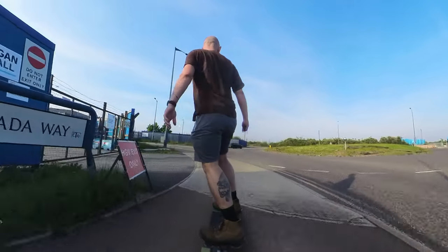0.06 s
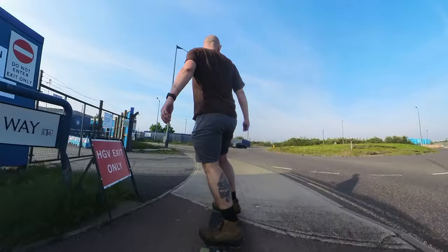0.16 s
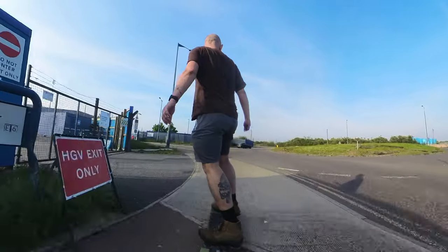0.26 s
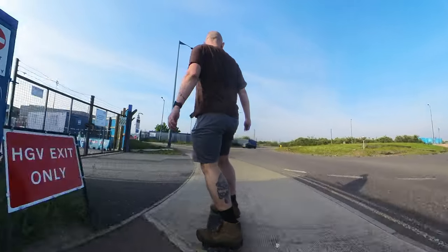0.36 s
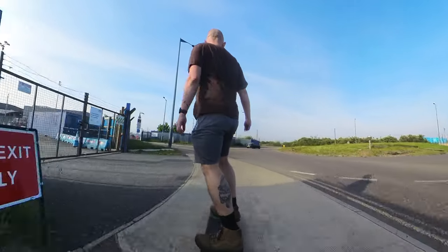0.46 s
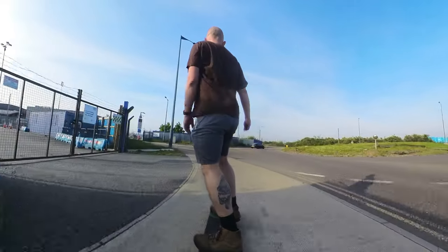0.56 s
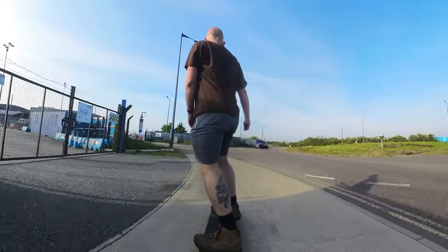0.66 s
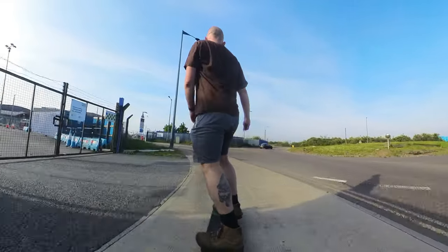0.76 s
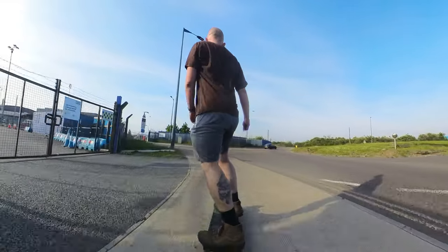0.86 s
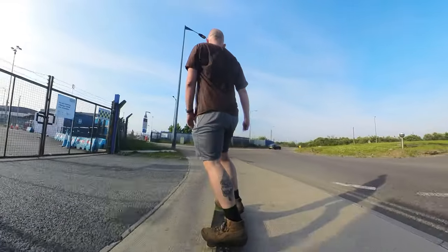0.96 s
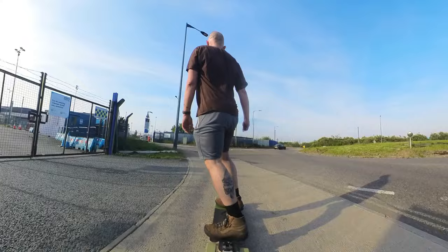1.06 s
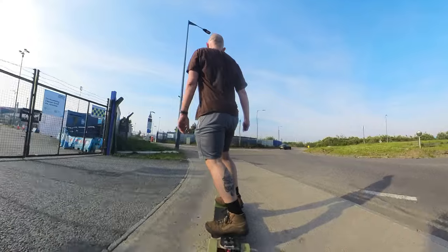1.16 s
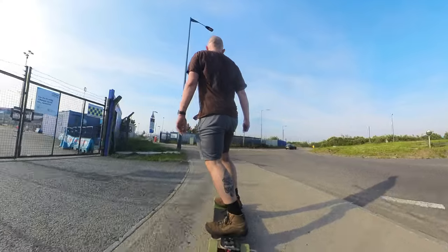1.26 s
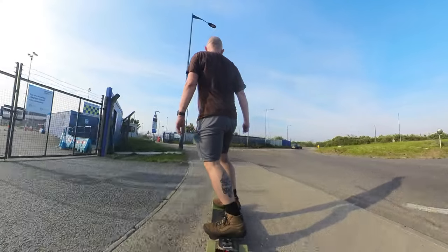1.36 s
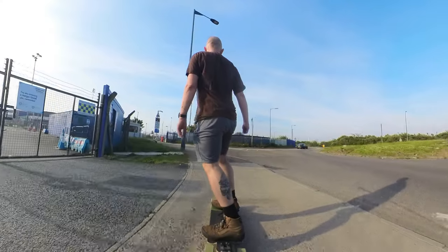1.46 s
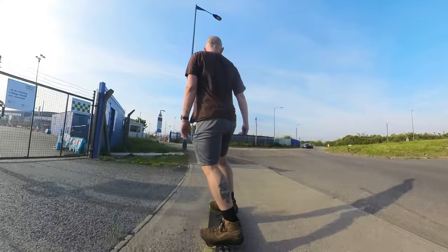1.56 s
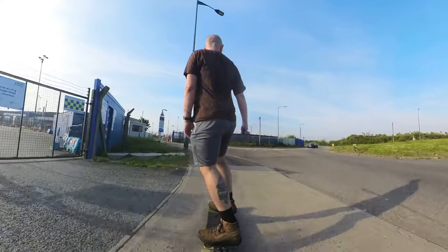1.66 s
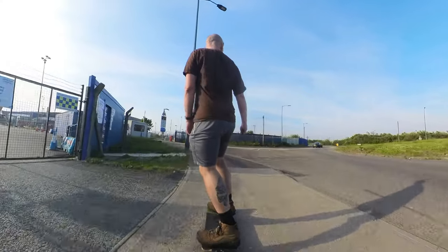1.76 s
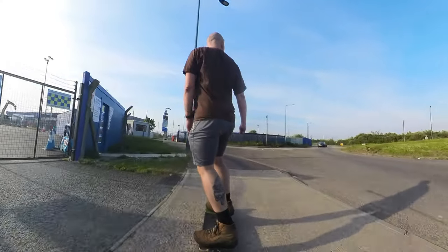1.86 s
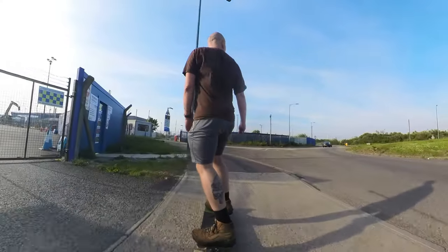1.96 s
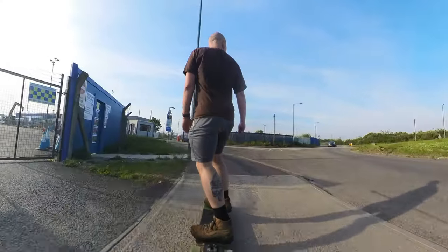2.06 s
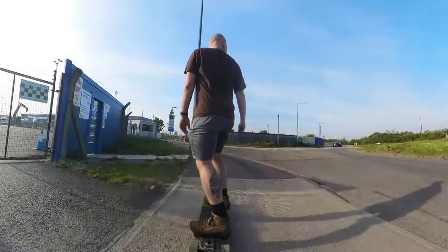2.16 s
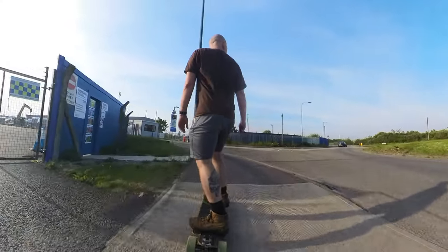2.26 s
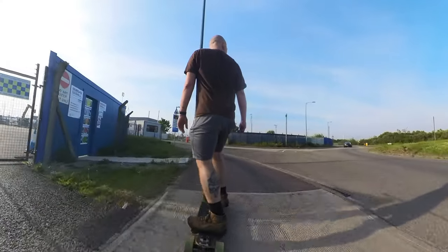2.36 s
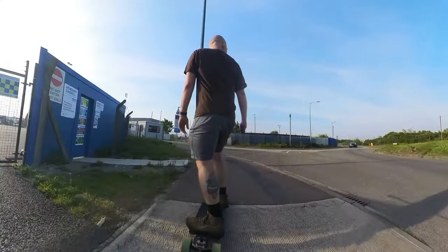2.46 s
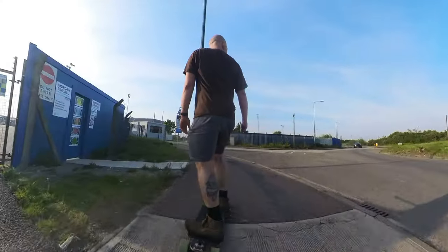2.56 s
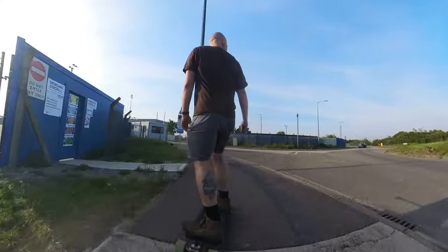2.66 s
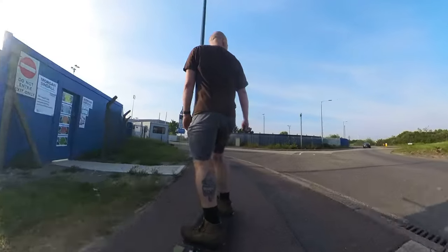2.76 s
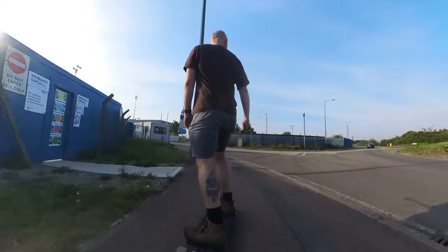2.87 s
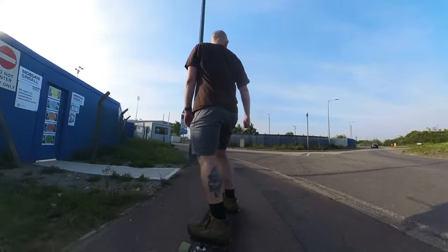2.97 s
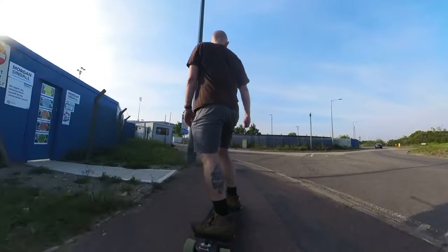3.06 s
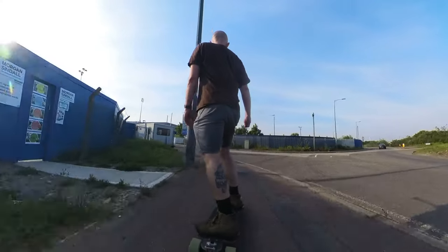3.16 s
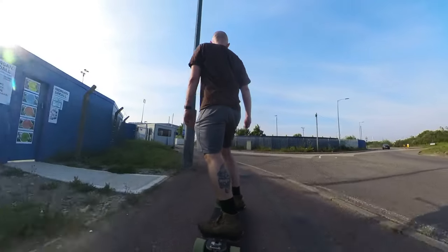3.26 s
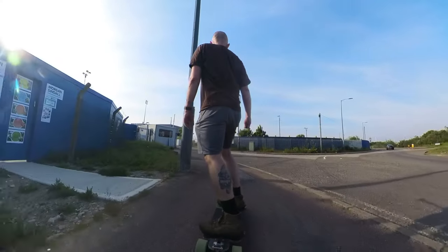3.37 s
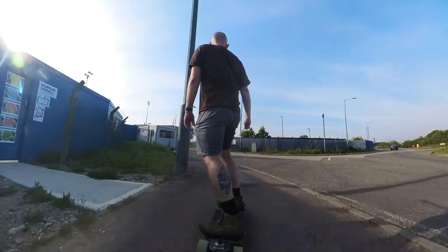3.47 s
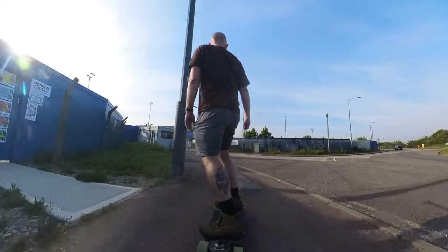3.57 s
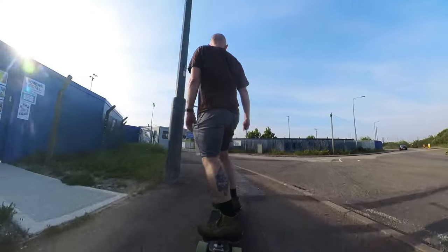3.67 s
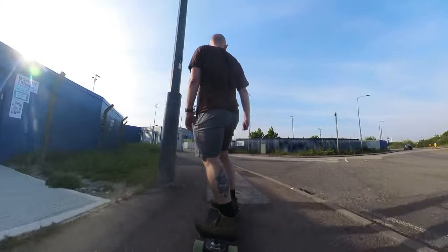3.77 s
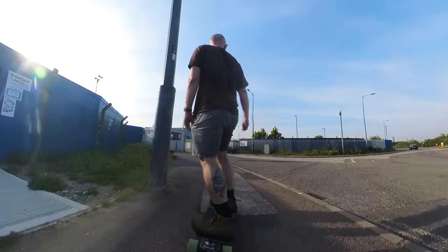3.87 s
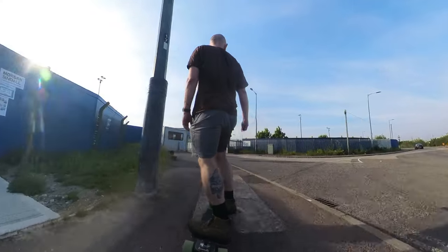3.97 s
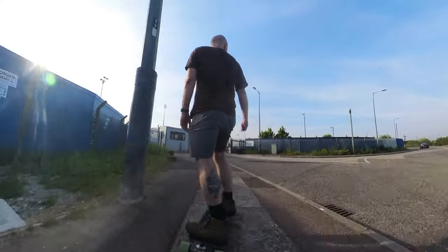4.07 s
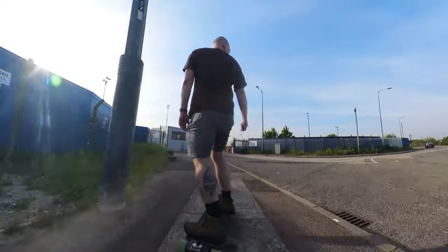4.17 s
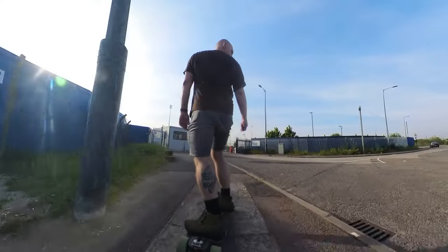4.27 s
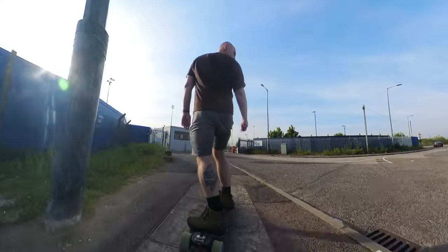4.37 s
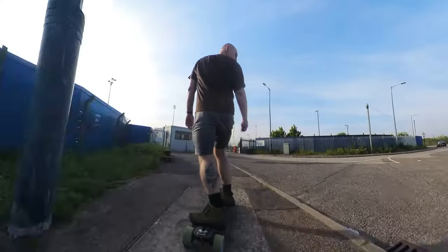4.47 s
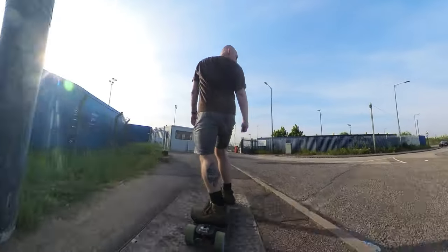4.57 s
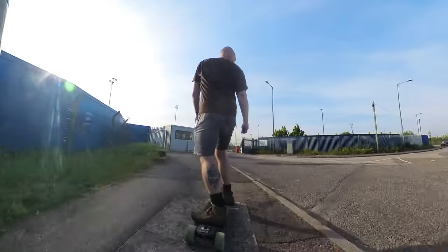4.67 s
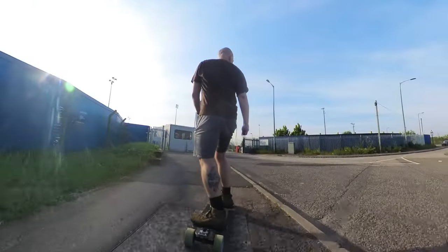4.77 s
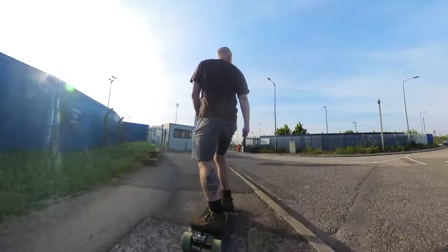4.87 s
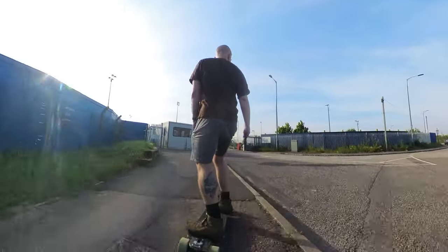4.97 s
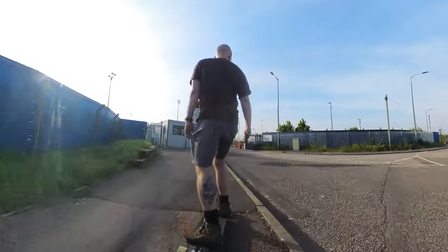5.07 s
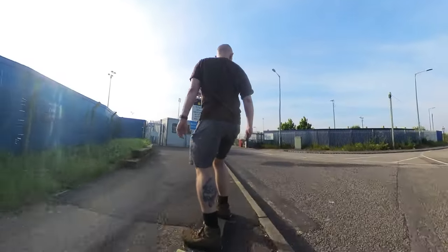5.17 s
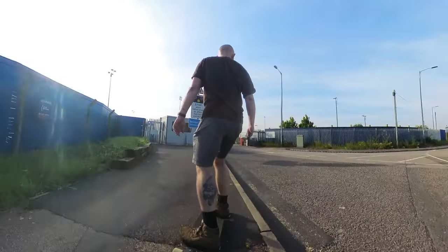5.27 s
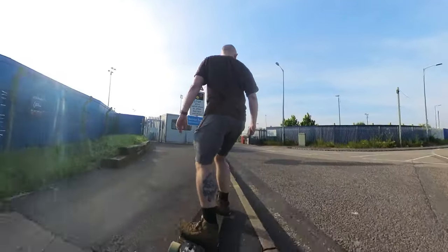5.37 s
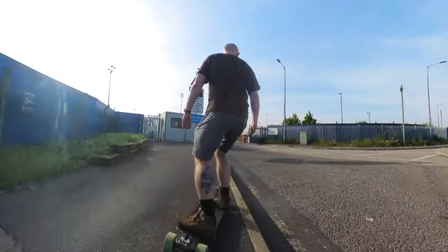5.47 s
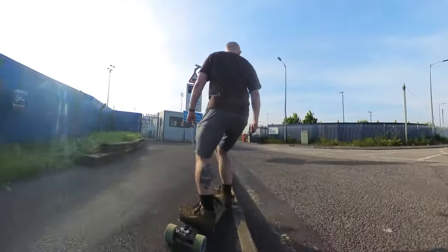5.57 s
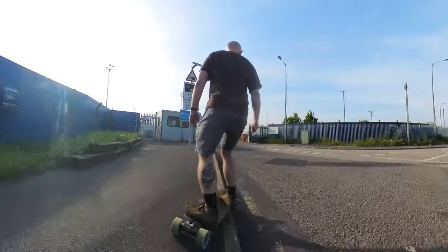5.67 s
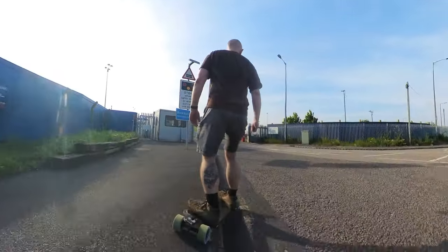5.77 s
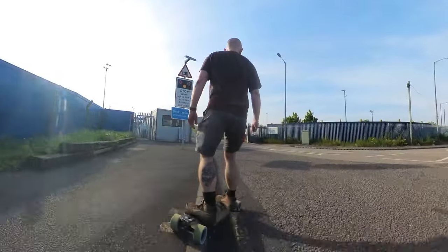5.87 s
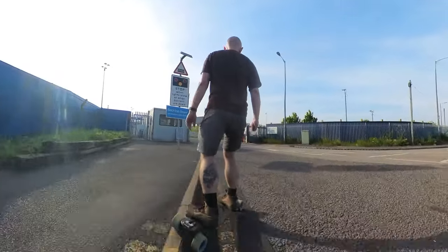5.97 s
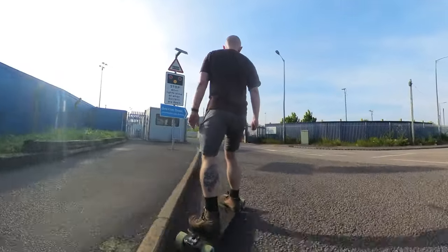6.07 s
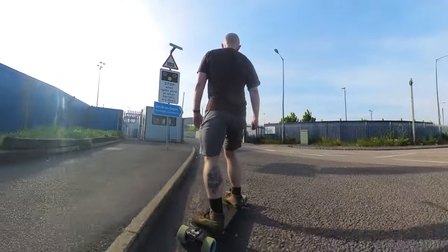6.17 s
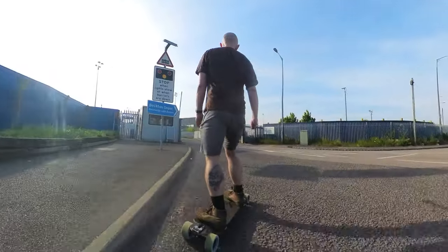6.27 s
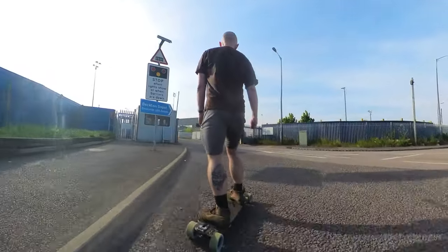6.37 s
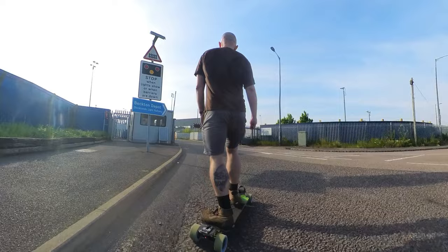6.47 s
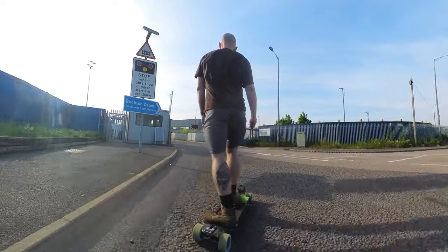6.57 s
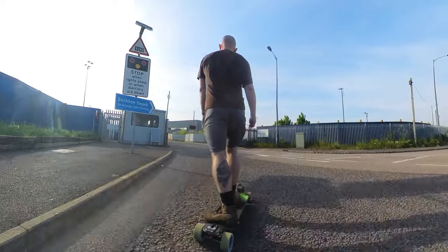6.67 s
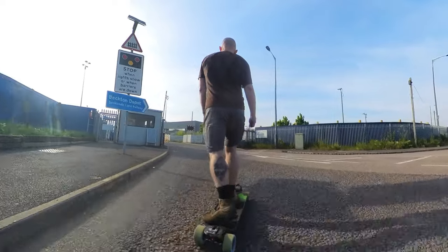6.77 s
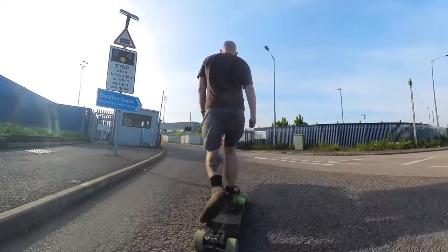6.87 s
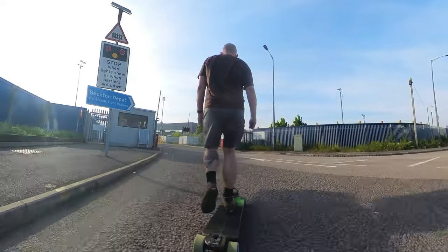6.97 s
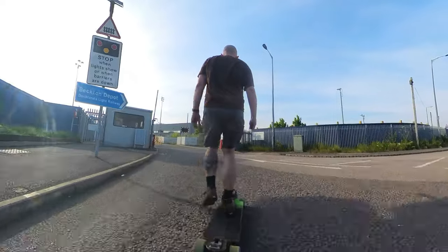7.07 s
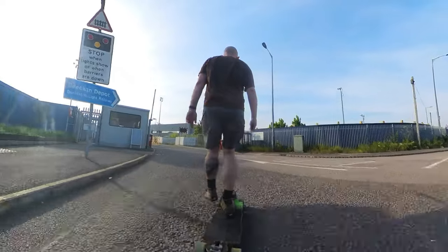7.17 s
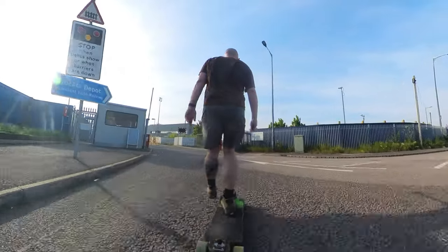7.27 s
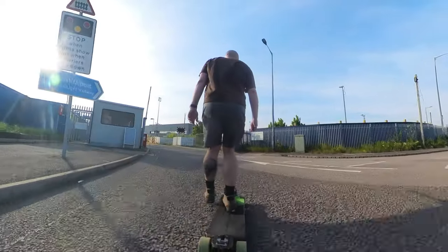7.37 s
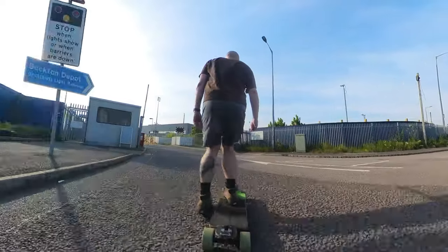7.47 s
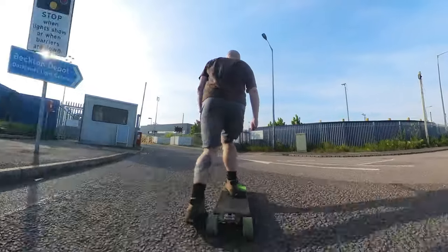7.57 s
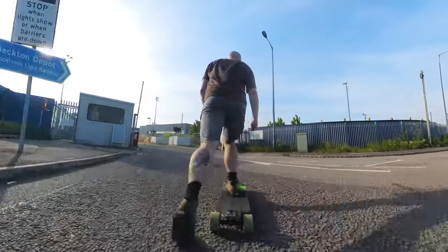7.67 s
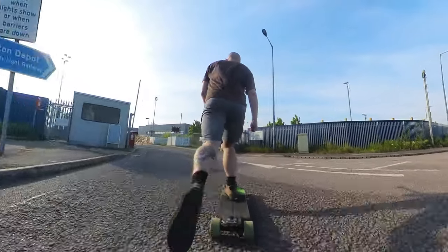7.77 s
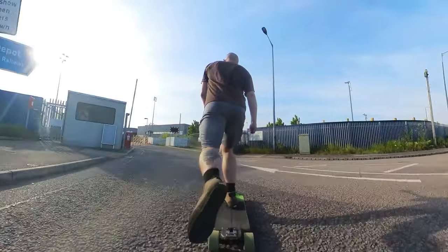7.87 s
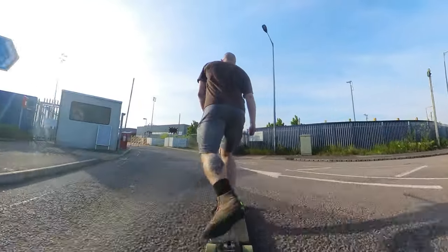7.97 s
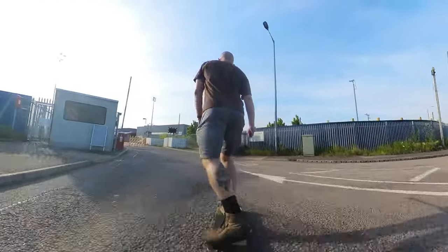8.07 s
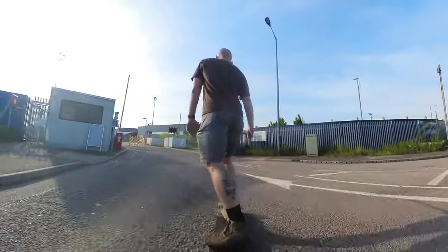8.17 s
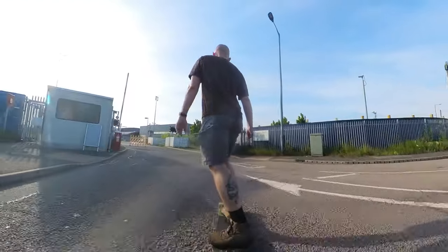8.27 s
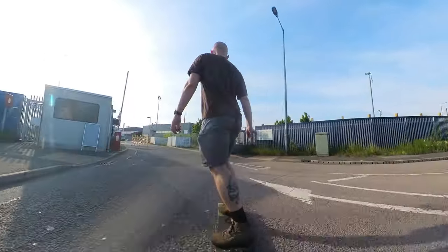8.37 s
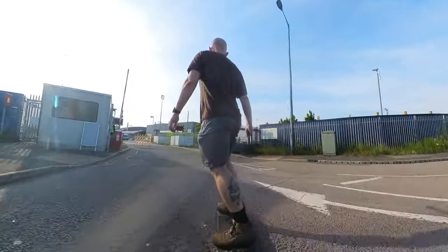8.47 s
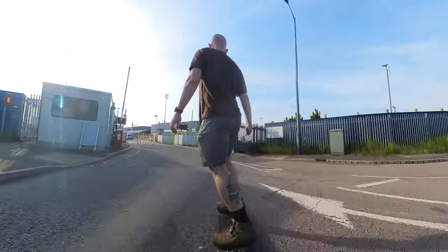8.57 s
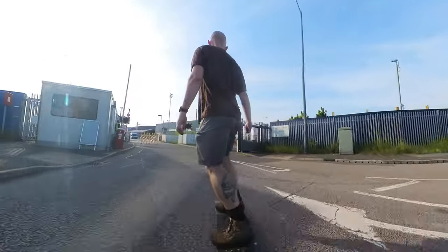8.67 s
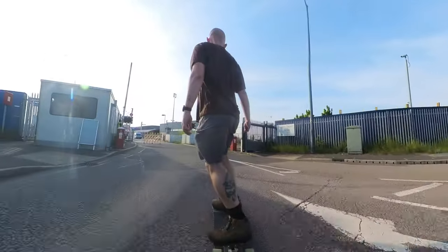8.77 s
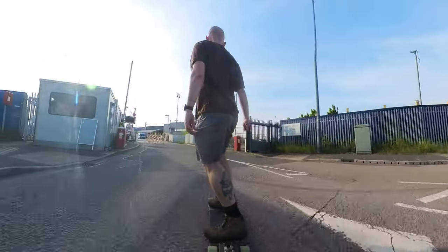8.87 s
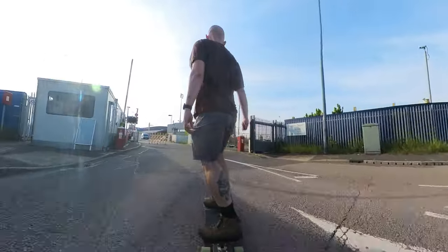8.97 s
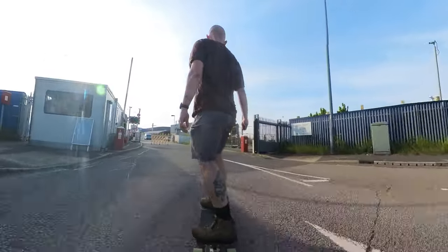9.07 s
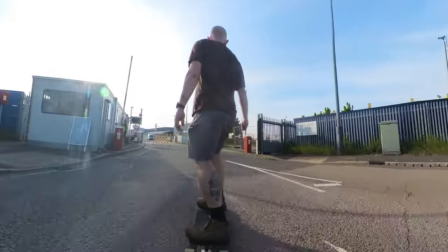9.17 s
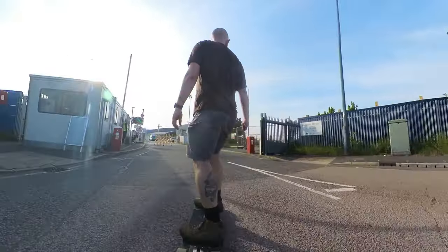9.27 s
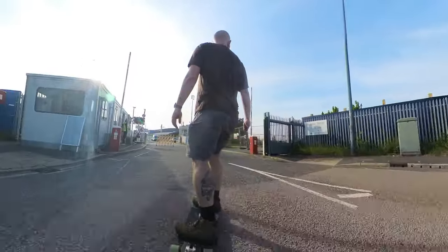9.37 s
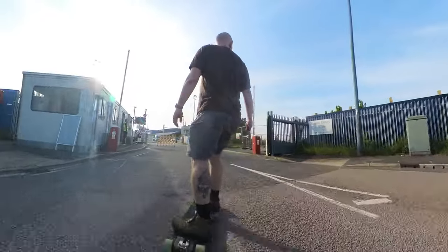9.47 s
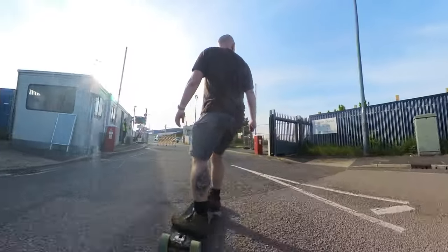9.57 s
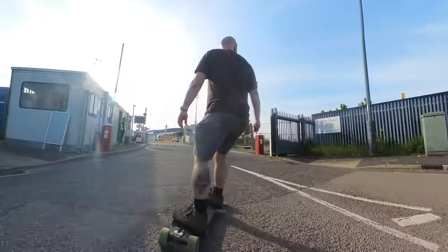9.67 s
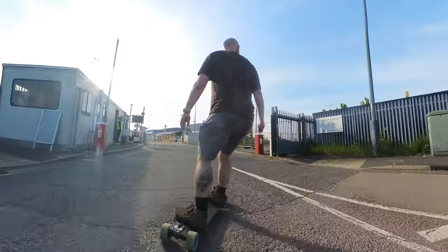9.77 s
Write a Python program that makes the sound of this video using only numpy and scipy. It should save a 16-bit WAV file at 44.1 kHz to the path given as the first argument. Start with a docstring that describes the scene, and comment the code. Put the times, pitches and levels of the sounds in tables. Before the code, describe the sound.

Outdoors, a microphone close behind a longboard picks up soft wheels rolling on pavement in a low, gritty hum. Joints and covers give short woody knocks and dull thuds, thickening into a heavy clatter around the middle. The board then drops off a kerb with sharp cracks, and rolls onto coarse asphalt, with rougher, rattling surges before it smooths out. Faint wind and a few tiny bird chirps sit behind.

```python
"""Longboard over rough paving

A longboard rolls over pavement, drain covers, a kerb and coarse asphalt, heard from a pole behind the rider.
Random stones in the road drive resonances of deck, trucks and bearings, and a broad tyre roar.
Joints and edges strike the same board with short noisy forces, bumps bend it, and one kerb blow rings it.
Loose grit ticks, snaps and scuffs in filtered bursts; far birds are gliding sines, wind is low lumpy noise.
The output stage rounds off peaks near full scale and cuts the extreme treble."""
import sys
import numpy as np
from scipy import signal
from scipy.fft import rfft, irfft, next_fast_len
from scipy.io import wavfile

SR = 44100
rng = np.random.default_rng(int(sys.argv[2]) if len(sys.argv) > 2 else 0)


def wrap_up_sound(samples):
    """Save the sound to the file named by the first command line argument, as 16-bit audio."""
    columns = np.atleast_2d(samples).T
    # keep every value between -1 and 1, then stretch to whole-number steps
    tamed = np.clip(columns, -1, 1)
    steps = np.round(tamed * 32767).astype(np.int16)
    wavfile.write(sys.argv[1], SR, steps)


N = 432609   # samples

# Resonances of the deck. Each row: centre in Hz, width in Hz, level in dB.
DECK_MODES = [(287, 87, 4.5), (541, 87, 4), (722, 65, -5.5), (960, 197, -4.5), (1350, 580, -11.5),
              (1500, 690, -15), (2005, 52, -23.5)]
# Resonances of the trucks. Each row: centre in Hz, width in Hz, level in dB.
TRUCK_MODES = [(1520, 400, 6), (1855, 170, -3)]
# Two ringing resonances of the truck hangers, then a broad hiss of fine sand.
# Each row: centre in Hz, width in Hz, level in dB.
HANGER_AND_SAND_MODES = [(3380, 220, -4), (3580, 110, 0), (4800, 3600, -17)]
# Low bending resonances of the deck. Each row: centre in Hz, width in Hz, level in dB.
BENDING_MODES = [(82.2, 47, -3), (130.9, 34.2, 2.5), (184, 92, -4.5)]
# How strongly rough ground sounds hangers and sand. Each row: time in seconds, level in dB.
HANGER_AND_SAND_LEVEL = [(0, -70), (1.3, -70), (1.7, -75), (4.4, -75), (4.75, -71), (5.2, -77), (5.85, -74),
                         (6.1, -66), (6.45, -67), (6.85, -75), (7.05, -70), (7.3, -63), (7.55, -62),
                         (7.75, -63), (7.87, -65), (7.97, -59), (8.1, -64), (8.2, -60), (8.3, -63),
                         (8.45, -72), (8.65, -77), (9.81, -75)]


def amp(db):
    """Decibels to gain."""
    return 10 ** (np.asarray(db) / 20)


def rms_one(x):
    """Scale to unit rms."""
    return x / np.sqrt(np.mean(x ** 2) + 1e-20)


def in_time(rows):
    """Draw each column of a timed table as a curve with one value a sample."""
    s, *columns = np.transpose(rows)
    return [np.interp(np.arange(N) / SR, s, column) for column in columns]


def drift(rate_hz):
    """Smooth random wander of unit rms: noise at a fortieth of the sample rate through a double pole."""
    r = np.exp(-80 * np.pi * rate_hz / SR)
    noise = rng.standard_normal(N // 40 + 2002)
    slow = signal.lfilter([1], [1, -2 * r, r * r], noise)[2000:]   # drop the filter's start
    return np.interp(np.arange(N) / 40, np.arange(len(slow)), rms_one(slow))


def resonate(x, hz, width_hz):
    """One two-pole resonance with gain 1 at its peak."""
    r = np.exp(-np.pi * width_hz / SR)
    feed = np.array([1, 0, -1]) * (1 - r * r) / 2
    return signal.lfilter(feed, [1, -2 * r * np.cos(2 * np.pi * hz / SR), r * r], x)


def body(x, modes):
    """Resonances in parallel, with alternating signs."""
    return sum((-1) ** k * amp(db) * resonate(x, hz, width) for k, (hz, width, db) in enumerate(modes))


def soften(x, hz):
    """Rubber wheels spread each contact in time, which acts as a low-pass."""
    return signal.sosfilt(signal.butter(3, hz, fs=SR, output="sos"), x)


def rolling(rolling_db, boom_db):
    """One road drives deck, bending, hangers and sand; further stones feed roar, bearings and trucks."""
    # Surface coarseness. Each row: time in seconds, bearing hiss in dB, truck rattle in dB.
    coarseness = [(0, -67.5, -62), (.6, -75, -63), (.9, -81, -76), (1.2, -76, -72), (1.6, -85, -76),
                  (2.7, -80, -61), (3.1, -83, -51), (4.4, -85, -62), (4.8, -80, -76), (5.3, -88, -82),
                  (5.85, -75, -55), (6.1, -76, -59), (6.45, -70.5, -71), (6.9, -77, -77), (7.1, -75, -60),
                  (7.3, -73, -54), (7.45, -75, -57), (7.6, -71, -60), (7.73, -65, -54), (7.87, -67, -64),
                  (7.93, -67, -48), (8.0, -65, -54), (8.1, -70, -69), (8.17, -65, -52), (8.28, -70, -57),
                  (8.42, -68, -70), (8.6, -78, -86), (9.05, -83, -74), (9.27, -72, -72), (9.81, -77, -82)]
    # Bearing resonances. Each row: centre in Hz, width in Hz, level in dB.
    bearing_modes = [(10500, 3000, -6), (12500, 1500, 0), (15300, 1500, -8)]
    roar_db = 2.5   # against the deck

    hiss_db, rattle_db = in_time(coarseness)
    ring_db = in_time(HANGER_AND_SAND_LEVEL)[0]
    road = stones(per_s=8000, spread_db=2.8, lumpy_db=.7)
    deck = rms_one(soften(soften(body(road, DECK_MODES), 2520), 2550))
    tyres = roar(stones(per_s=9000, spread_db=3.0, lumpy_db=1.0))
    hum = rms_one(deck + amp(roar_db) * tyres)

    bending_force = road + 2.3 * rng.standard_normal(N)
    boom = rms_one(body(body(bending_force, BENDING_MODES), BENDING_MODES))
    hiss = rms_one(body(stones(per_s=6000, spread_db=2.5, lumpy_db=2.1), bearing_modes))

    # loose hardware rattles in surges over its own sparser stream of stones
    loose = stones(per_s=1200, spread_db=2.5, lumpy_db=0.0) * amp(3.8 * drift(13.4))
    rattle = soften(jangle(loose, TRUCK_MODES), 2340)
    ring = jangle(road + 0.85 * loose, HANGER_AND_SAND_MODES)

    board = amp(rolling_db) * hum + amp(boom_db) * boom
    treble = amp(hiss_db) * hiss + amp(rattle_db) * rattle + amp(ring_db) * ring
    return board + treble


def stones(per_s, spread_db, lumpy_db):
    """Stones of uneven size pass under the wheels, as random impulses in lumps."""
    sizes = amp(spread_db * np.minimum(rng.exponential(1, N), 4)) * rng.choice([-1, 1], N)
    met = rng.random(N) < per_s / SR
    lumps = amp(lumpy_db * (drift(35) + drift(52)))
    return rms_one(sizes * met * lumps) + 1e-18


def roar(contact):
    """The contact patch radiates a broad roar, strongest in the low mids and falling towards the treble."""
    # Tyre roar spectrum. Each row: frequency in Hz, relative density in dB per Hz.
    roar_shape = [(90, -33), (150, -10), (250, -1.5), (370, -10.5), (590, -3.5), (660, -13.5),
                  (1000, -14.5), (1600, -20.5), (2080, -26), (2300, -31), (3500, -38), (5000, -46),
                  (8000, -56), (16000, -75)]
    hz, db = np.transpose(roar_shape)
    size = next_fast_len(N)
    grid = np.arange(size // 2 + 1) * SR / size + 1   # 1 Hz up, so the logarithm exists
    gain = amp(np.interp(np.log(grid), np.log(hz), db))
    return rms_one(irfft(rfft(contact, size) * gain, size)[:N])


def jangle(force, modes):
    """Resonances take turns in level, so the pitch seems to wander."""
    out = 0
    for hz, width, db in modes:
        mode = resonate(resonate(force, hz, width), hz, 3 * width)
        out = out + amp(db + 2.0 * drift(9.5)) * mode
    return rms_one(out)


def knocks():
    """Wheels meet edges: a short shudder rings a deck tone and upper modes of chance strength."""
    # Each row: start in seconds, level of the deck tone's peak in dB, main deck tone in Hz,
    # upper ring against that tone in dB, shudder decay in seconds (1 ms at least).
    edge_hits = [(0.272, -21.5, 237, -22, 0.0053), (0.352, -20.5, 273, -13.5, 0.014),
                 (0.579, -21, 233, -11, 0.01), (0.737, -29, 440, -30, 0.0059),
                 (0.931, -31, 258, -17, 0.028), (2.576, -19, 273, -11, 0.016),
                 (2.588, -13.5, 314, -17, 0.014), (2.843, -26, 440, -15, 0.023),
                 (2.852, -19.5, 407, -18, 0.021), (3.733, -30, 610, -15, 0.0099),
                 (3.964, -19.5, 198, -19.5, 0.044), (3.974, -19, 590, -12.5, 0.011),
                 (4.24, -18, 326, -22, 0.022), (4.275, -24.5, 400, -18, 0.014),
                 (4.529, -16.5, 294, -19, 0.0084), (4.69, -12, 303, -6.5, 0.0067),
                 (4.719, -9, 204, -12.5, 0.011), (4.738, -10.5, 290, -15.5, 0.014),
                 (4.833, -16.5, 202, -20, 0.016), (4.981, -21, 454, -30, 0.0053),
                 (5.112, -23, 446, -15, 0.011), (5.211, -24.5, 240, -21, 0.042),
                 (5.822, -26.5, 620, -7, 0.0056), (5.911, -27, 596, -5, 0.029),
                 (5.956, -10.5, 497, -14, 0.0065), (5.963, -16, 200, -10, 0.0044),
                 (5.977, -19, 610, -20, 0.0034), (6.029, -21, 367, -17, 0.014),
                 (6.091, -16.5, 327, -13, 0.015), (6.202, -8.5, 636, -7.5, 0.011),
                 (6.209, -5, 277, -10.5, 0.0016), (6.223, -5.5, 600, -16, 0.01),
                 (6.446, -19, 620, -3, 0.0089), (6.553, -18.5, 291, -13.5, 0.03),
                 (6.569, -21.5, 466, -10.5, 0.012), (7.149, -29.5, 583, -1, 0.004),
                 (7.181, -32, 560, -3, 0.006), (7.314, -22.5, 825, -9, 0.0076),
                 (7.53, -38, 600, -2, 0.0027), (7.67, -25, 210, -3, 0.006), (7.719, -19, 600, -12.5, 0.028),
                 (7.948, -22, 503, -9, 0.022), (8.066, -22, 504, -3, 0.0059), (8.131, -27, 600, -9, 0.0044),
                 (8.172, -20, 301, -8, 0.0028), (8.246, -17, 525, -16, 0.0068),
                 (8.274, -17.5, 633, -7, 0.0029), (8.283, -15, 650, -2, 0.0037),
                 (8.289, -13, 710, -9, 0.0018), (8.3, -35, 576, -11, 0.0033),
                 (8.312, -18.5, 655, -26, 0.0058), (8.386, -16, 640, -17, 0.0024),
                 (9.26, -32, 580, 5.5, 0.0045), (9.303, -27.5, 301, -19, 0.02)]
    ring_low_hz, ring_high_hz = 1416, 1940
    aftershake_db, aftershake_s = -13.5, 0.024   # the board keeps trembling after a knock
    crunch_db, crunch_low_hz, crunch_high_hz = -7.5, 700, 2330   # crushed grit, against the clack

    size = 5000
    out = np.zeros(N + size)
    t = np.arange(size) / SR
    crunch_band = signal.butter(2, [crunch_low_hz, crunch_high_hz], "band", fs=SR, output="sos")
    metal = [(hz, width, db - 32.0) for hz, width, db in TRUCK_MODES[1:] + HANGER_AND_SAND_MODES[:1]]
    modes = DECK_MODES + metal
    draws = rng.standard_normal((len(edge_hits), size))
    luck = rng.standard_normal((len(edge_hits), len(modes)))
    rings = ring_low_hz + (ring_high_hz - ring_low_hz) * rng.random(len(edge_hits))

    for (s, db, hz, bright_db, shudder), noise, strengths, ring_hz in zip(edge_hits, draws, luck, rings):
        force = .15 * noise * np.exp(-t / max(shudder, .001)) * np.minimum(t / .002, 1)
        tremble = noise[::-1] * np.exp(-t / aftershake_s) * np.minimum(t / 0.0045, 1)
        force += 0.16 * amp(aftershake_db) * tremble
        force[:30] -= .2 * np.hanning(30)   # the wheel climbs the edge
        force = soften(force, 7800)

        struck = [(f, 1.04 * width, level + 3.7 * k) for (f, width, level), k in zip(modes, strengths)]
        # the four lowest deck modes colour the tone, the others make the clack
        tone = soften(resonate(force, hz, 60) + 0.5 * body(force, struck[:4]), 1260)
        ring = resonate(resonate(force, ring_hz, 300), ring_hz, 550)
        clack = body(force, struck[4:]) + 0.26 * ring
        clack = soften(soften(clack, 2400), 2400)
        crunch = signal.sosfilt(crunch_band, force * np.abs(noise[::-1]))
        crunch = soften(soften(crunch, crunch_high_hz), crunch_high_hz)

        upper = clack / np.abs(clack).max() + amp(crunch_db) * crunch / np.abs(crunch).max()
        hit = tone / np.abs(tone).max() + amp(bright_db) * upper / np.abs(upper).max()
        at = round(s * SR)
        out[at:at + size] += amp(db) * hit
    return out[:N]


def kerb():
    """The front truck hits the kerb stone: a noisy crack and a few decaying deck modes."""
    # Start in seconds, then the deck modes. Each mode row: frequency in Hz, starting level in dB,
    # time to fall by 60 dB in seconds.
    kerb_blow = (5.9354, [(464.5, 17.5, 0.022), (340, 9.5, 0.013), (770, 0.5, 0.019), (1050, 2.5, 0.016)])
    crack_db, crack_t60_s = 4.5, 0.039
    s, modes = kerb_blow
    t = np.maximum(np.arange(N) / SR - s, 0)
    crack = amp(crack_db - 60 * t / crack_t60_s) * (t > 0) * soften(rng.standard_normal(N), 2100)
    ring = sum(amp(db - 60 * t / t60) * np.sin(2 * np.pi * hz * t) for hz, db, t60 in modes)
    return crack - np.minimum(t / 0.00047, 1) * ring


def bumps():
    """Each bump pushes the deck once and shakes it briefly; its bending modes ring out."""
    # Each row: start in seconds, peak level in dB.
    deck_bumps = [(0.13, -34), (0.344, -28), (0.566, -20.5), (0.93, -26), (1.502, -23.5), (2.061, -30),
                  (2.35, -23), (2.584, -27), (2.849, -28), (3.247, -33), (3.505, -29.5), (3.777, -38),
                  (3.957, -19), (4.118, -23), (4.237, -14), (4.277, -14), (4.53, -15), (4.702, -6),
                  (4.815, -11.5), (4.907, -28), (4.979, -17), (5.039, -15.5), (5.509, -28), (5.922, -19),
                  (6.096, -39), (6.197, -15), (6.546, -27), (7.727, -32), (7.933, -26), (8.153, -35),
                  (8.552, -26), (8.739, -26.5), (8.989, -29.5), (9.299, -34.5)]
    push_s, shake_s, shake_db = 0.0062, 0.018, 11.5
    size = 8000
    out = np.zeros(N + size)
    t = np.arange(size) / SR
    push = np.sin(np.pi * np.minimum(t / push_s, 1)) ** 2
    luck = rng.standard_normal((len(deck_bumps), len(BENDING_MODES)))
    draws = rng.standard_normal((len(deck_bumps), size))
    for (s, db), noise, strengths in zip(deck_bumps, draws, luck):
        force = amp(shake_db) * noise * np.exp(-t / shake_s) - push
        bent = [(f, width, level + 2.8 * k) for (f, width, level), k in zip(BENDING_MODES, strengths)]
        thud = soften(body(force, bent), 283)
        at = round(s * SR)
        out[at:at + size] += amp(db) * thud / np.abs(thud).max()
    return out[:N]


def ticks():
    """A grain of grit cracks in a few cycles: a short noise burst through one wide resonance."""
    # The loudest grains. Each row: start in seconds, peak level in dB, pitch in Hz.
    loud_grains = [(0.3511, -40, 3500), (0.5841, -42, 3540), (1.2136, -46, 2500), (2.5411, -48, 3170),
                   (2.574, -41, 3530), (4.586, -43, 3150), (4.6897, -46, 3060), (4.721, -33, 4130),
                   (4.7391, -48, 4540), (4.75, -47, 3700), (4.757, -50, 3700), (4.8524, -42, 3170),
                   (4.9103, -41.5, 3930), (4.9801, -50, 3180), (5.1078, -46.5, 3230), (5.2135, -48, 3100),
                   (5.2694, -51, 3430), (5.821, -44, 3170), (5.9224, -36, 3710), (5.957, -32, 3750),
                   (6.0057, -44, 3230), (6.0596, -44, 3550), (6.078, -46, 3580), (6.094, -46, 5170),
                   (6.105, -41, 3600), (6.1394, -45, 8100), (6.181, -47, 3120), (6.2030, -30, 3180),
                   (6.2090, -32, 3180), (6.2244, -39, 3410), (6.4492, -52, 3070), (6.561, -46, 3420),
                   (7.184, -46, 3500), (7.313, -46, 3420), (7.5368, -44, 3280), (7.5802, -40, 3380),
                   (7.7084, -43, 3380), (7.942, -50, 3610), (7.958, -42, 3510), (7.9912, -43, 3550),
                   (8.1623, -45, 3470), (8.4444, -45, 4700)]
    # fainter grains fall at random; their level follows that of hangers and sand
    grit_per_s, grit_db, grit_spread_db = 6, 11, 2
    size = 400
    out = np.zeros(N + size)
    seconds = (N - 1) / SR
    ring_db = in_time(HANGER_AND_SAND_LEVEL)[0]
    grains = list(loud_grains)
    for when, strength, pitch in rng.random((round(grit_per_s * seconds), 3)):
        level = ring_db[int(when * (N - 1))] + grit_db - grit_spread_db * np.log(1 - strength)
        grains.append((seconds * when, level, 2400 + 2300 * pitch))

    decay = np.exp(-np.arange(size) / SR / 0.0042)
    for (s, db, hz), noise in zip(grains, rng.standard_normal((len(grains), size))):
        tick = resonate(noise * decay, hz, 0.32 * hz)
        tick = soften(tick, min(1.8 * hz, 15000))
        at = round(s * SR)
        out[at:at + size] += amp(db) * tick / np.abs(tick).max()
    return out[:N]


def snaps():
    """Dry snaps of the finest grit: single clicks with only their treble heard."""
    # Each row: start in seconds, click level in dB before a common 8 dB lift.
    fine_snaps = [(1.2136, -38), (1.4794, -58), (2.7187, -56), (2.9388, -34.5), (4.6783, -50), (4.911, -47),
                  (5.0599, -64), (5.1083, -42), (5.3882, -58), (5.4949, -48), (5.7934, -60), (6.1724, -60),
                  (6.2896, -44), (6.5524, -48), (6.975, -59), (7.007, -55), (7.172, -46), (7.8346, -51),
                  (7.9414, -45)]
    s, db = np.transpose(fine_snaps)
    clicks = np.zeros(N)
    clicks[np.round(s * SR).astype(int)] = amp(db + 8)
    return signal.sosfilt(signal.butter(2, 2000, "high", fs=SR, output="sos"), clicks + 1e-18)


def scuffs():
    """Wheels scuff over grit: bursts of grainy noise, quick to start, fading out."""
    # Each row: start in seconds, length in seconds, rms level before the fades in dB, top of the band in Hz.
    grit_scuffs = [(2.58, 0.028, -55.5, 6000), (4.586, 0.026, -56, 5500), (4.69, 0.012, -44, 3300),
                   (4.72, .012, -59, 5900), (4.739, 0.013, -46, 3200), (5.22, 0.025, -66, 8000),
                   (5.916, 0.012, -54, 6000), (5.956, .018, -37, 5900), (6.03, 0.01, -62, 6000),
                   (6.088, 0.019, -54.5, 5930), (6.174, 0.012, -66, 6000), (6.205, 0.015, -40, 4000),
                   (6.222, 0.018, -44, 4000), (6.541, 0.038, -56.5, 4470), (7.945, 0.055, -64, 6500),
                   (8.282, 0.013, -56, 5000), (8.433, 0.053, -60, 5300)]
    out = np.zeros(N)
    for (s, length, db, top_hz), noise in zip(grit_scuffs, rng.standard_normal((len(grit_scuffs), 5000))):
        share = np.linspace(0, 1, round(length * SR))
        band = signal.butter(4, [1800, top_hz], "band", fs=SR, output="sos")
        grainy = rms_one(signal.sosfilt(band, noise * noise[::-1]))
        fades = np.minimum(share / 0.11, 1) * np.sqrt(1 - share ** 3)
        at = round(s * SR)
        out[at:at + len(share)] += amp(db) * grainy[-len(share):] * fades
    return out


def birds():
    """Faint far birds: thin whistles whose pitch glides in a straight line."""
    # Each row: start in seconds, length in seconds, first pitch in Hz, last pitch in Hz, peak level in dB.
    bird_chirps = [(1.25, 0.095, 3010, 2870, -62), (1.273, 0.065, 3330, 3140, -69),
                   (1.505, 0.066, 2810, 2770, -60), (1.545, .045, 3300, 3260, -68),
                   (1.585, .03, 3000, 2980, -68), (1.63, 0.018, 3220, 3260, -58),
                   (7.046, .018, 4900, 4300, -66), (7.06, .022, 4280, 4230, -62),
                   (7.15, .012, 4650, 4800, -63), (7.167, 0.016, 4550, 4950, -62),
                   (7.19, 0.016, 4480, 4850, -60), (7.207, .016, 4550, 4950, -60)]
    out = np.zeros(N)
    for s, length, from_hz, to_hz, db in bird_chirps:
        hz = np.linspace(from_hz, to_hz, round(length * SR))
        whistle = np.sin(2 * np.pi * np.cumsum(hz) / SR)
        at = round(s * SR)
        out[at:at + len(hz)] += amp(db) * np.hanning(len(hz)) ** .5 * whistle
    return out


def wind(wind_db):
    """Wind buffets the microphone port as lumpy low pressure, a band of noise at 18 to 58 Hz."""
    low = signal.butter(2, [18, 58], "band", fs=SR, output="sos")
    buffeting = rms_one(signal.sosfilt(low, rng.standard_normal(N)))
    return amp(wind_db + 1.1 * drift(11.0)) * buffeting


def air():
    """Still air and microphone hiss: steady noise through broad treble resonances."""
    # Each row: centre in Hz, width in Hz, level in dB.
    air_modes = [(5500, 4000, 0), (11000, 9000, -6)]
    return amp(-74.5) * rms_one(body(rng.standard_normal(N), air_modes))


def scene():
    """Board, grit, birds, air and wind in one channel."""
    # The ride over changing surfaces. Each row: time in seconds, rolling level in dB,
    # deck boom in dB, wind in dB, all before their random wander.
    ride = [(0, -38, -40, -37), (.87, -38.5, -38, -41), (1.75, -39, -39.5, -36), (2.4, -38, -35, -41.5),
            (2.7, -40.5, -43, -44), (3.47, -42, -40.5, -47), (3.92, -39, -39.5, -47),
            (3.98, -37.5, -34, -30.5), (4.45, -37.5, -30.5, -27.5), (4.66, -35, -28, -30),
            (4.77, -34.5, -25, -32), (4.85, -34.5, -25.5, -33), (5.05, -38, -33.5, -34),
            (5.2, -44.5, -41.5, -37.5), (5.65, -42, -44.5, -44), (6.05, -39, -42, -39),
            (6.6, -40.5, -41.5, -33.5), (7.0, -42.5, -43.5, -39), (7.4, -37.5, -38, -38),
            (7.96, -32.5, -33.5, -39.5), (8.1, -36.5, -38.5, -44), (8.3, -32.5, -36.5, -39.5),
            (8.65, -41, -46, -51.5), (9.81, -39.5, -39, -45)]
    roll_wander_db, boom_wander_db, wander_hz = 1.78, 1.5, 5.8   # the paving is never quite even
    rolling_db, boom_db, wind_db = in_time(ride)
    rolling_db = rolling_db + roll_wander_db * drift(wander_hz)
    boom_db = boom_db + boom_wander_db * drift(wander_hz)
    board = rolling(rolling_db, boom_db) + knocks() + kerb() + bumps()
    grit = ticks() + snaps() + scuffs()
    return (board + grit + birds() + wind(wind_db) + air())[None]


def record(dry):
    """Full scale clips with a short knee, then a steep low-pass cuts the top."""
    cutoff_hz = 16350
    clipped = dry / (1 + np.abs(dry) ** 4) ** (1 / 4)
    top_cut = signal.cheby2(18, 70, cutoff_hz, fs=SR, output="sos")
    return np.clip(signal.sosfilt(top_cut, clipped), -1, 1)


dry = scene()
out = record(dry)
wrap_up_sound(out)
```